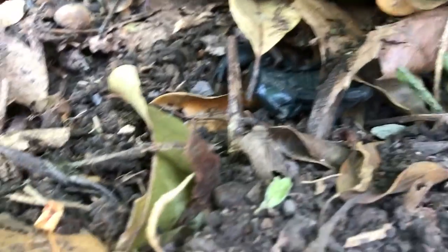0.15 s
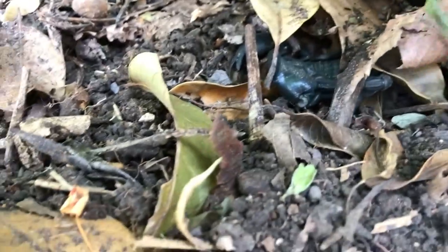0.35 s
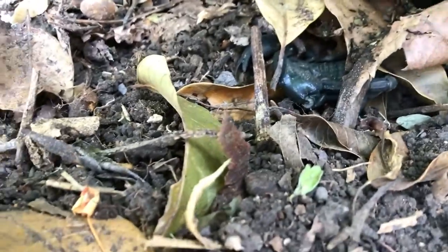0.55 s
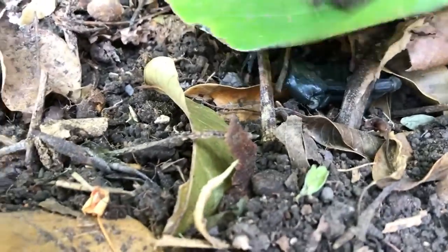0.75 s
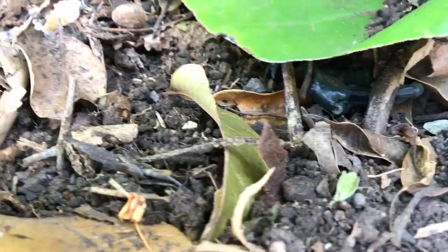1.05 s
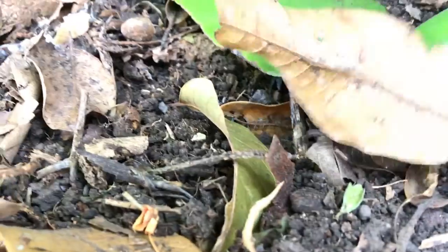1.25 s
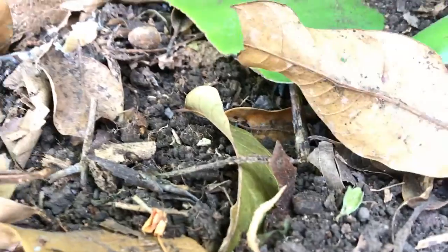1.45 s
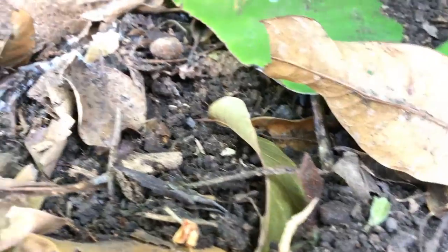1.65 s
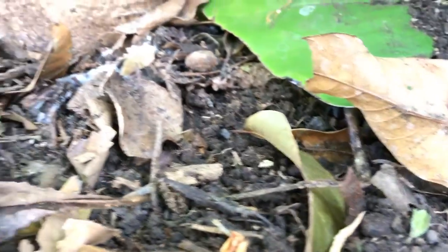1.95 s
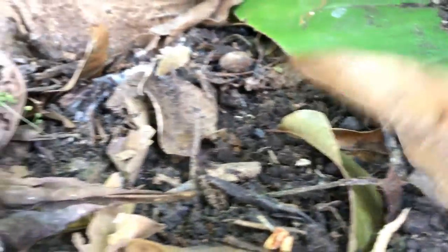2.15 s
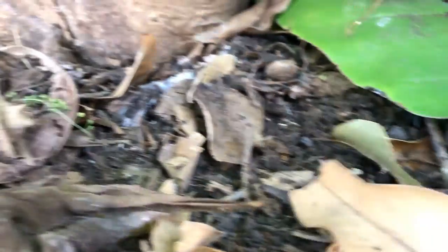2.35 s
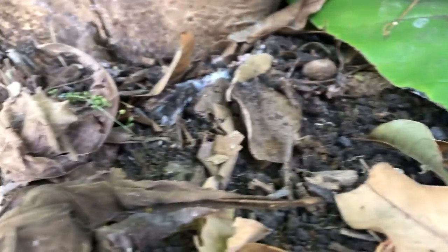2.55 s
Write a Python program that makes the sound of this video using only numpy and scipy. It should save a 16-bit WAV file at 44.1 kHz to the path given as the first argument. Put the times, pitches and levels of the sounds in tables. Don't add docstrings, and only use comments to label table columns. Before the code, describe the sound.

Dry leaves rustle and crackle in uneven bursts, scraped over soil litter close to the microphone

```python
import sys
import numpy as np
from scipy import signal
from scipy.fft import rfft, irfft
from scipy.io import wavfile
from scipy.ndimage import uniform_filter1d

SR = 44100
rng = np.random.default_rng(int(sys.argv[2]) if len(sys.argv) > 2 else 0)


def file_out(sig):
    cols = np.atleast_2d(sig).T
    lim = np.clip(cols, -1, 1)
    pcm = np.round(lim * 32767).astype(np.int16)
    wavfile.write(sys.argv[1], SR, pcm)


def gain_from_decibels(decibels):
    exponent = np.asarray(decibels, float) / 20
    return 10 ** exponent


N = 119070


def rms_one(x):
    return x / np.sqrt(np.mean(x ** 2) + 1e-20)


def coloured(x, points):
    hz, db = np.transpose(points)
    f = np.maximum(np.arange(len(x) // 2 + 1) * SR / len(x), 1)
    gain_db = np.interp(np.log(f), np.log(hz), db, left=-70)
    return irfft(rfft(x) * gain_from_decibels(gain_db), len(x))


def ring(clicks, hz, t60):
    r = gain_from_decibels(-60 / (t60 * SR))
    w = 2 * np.pi * min(hz, 0.45 * SR) / SR
    return signal.lfilter([0, np.sin(w)], [1, -2 * r * np.cos(w), r * r], clicks + 1e-18)


def fade(x, seconds):
    return signal.lfilter([1], [1, -np.exp(-1 / (max(seconds, 1e-4) * SR))], x)


def thin_below_pitch(x, hz):
    return signal.sosfilt(signal.butter(2, 0.6 * hz, "high", fs=SR, output="sos"), x)


def ground_dip(x, hz, width_hz, depth):
    return x - depth * signal.lfilter(*signal.iirpeak(hz, hz / width_hz, fs=SR), x)


# frequency in Hz, level in dB.
INLET_COLOUR = [(6800, -27), (7600, -5.5), (9400, 0), (10500, -8), (11200, -0.5), (12800, 1.5),
                (14200, -7.5), (15500, -2.5)]


def inlet(x):
    return coloured(x, INLET_COLOUR)


# frequency in Hz, level in dB.
LEAF_COLOUR = [(180, -7), (300, -6.5), (955, -8), (1300, -3), (1900, -5), (3000, -2.5), (5580, -2.5),
               (7500, -7), (9750, -37), (16500, -120)]


def leaf_body(x):
    return coloured(x, LEAF_COLOUR)


# frequency in Hz, level in dB.
RUMBLE_COLOUR = [(20, -37), (40, -8.5), (56, 1), (85, -8), (220, -11), (400, -28.5), (2000, -36.5),
                 (6000, -45.5)]


def rumble():
    return gain_from_decibels(-47) * rms_one(coloured(rng.standard_normal(N), RUMBLE_COLOUR))


# start in seconds, peak in dB, pitch
# in Hz, t60 in seconds.
VEIN_BREAKS = [(1.193, -13, 5550, .008), (1.1932, -20.5, 4100, 0.027), (1.1931, -21, 5230, .022),
               (1.1931, -22, 5980, .022), (1.1931, -23.5, 9270, 0.02), (1.1935, -29, 2900, .03),
               (1.3214, -15.5, 4450, 0.0067), (1.3216, -23, 1700, .011), (1.3216, -29, 11500, 0.011),
               (.9992, -17, 11600, .005), (2.3663, -17, 3030, .022), (2.3688, -18.5, 2990, 0.015),
               (2.368, -29.5, 760, 0.048), (.2262, -34.5, 1040, 0.017), (0.00395, -38, 474, .04),
               (.5, -30, 760, .04), (1.3635, -27, 4000, .003), (.168, -40, 3500, .003),
               (2.1775, -22, 1250, .025), (1.4215, -30.5, 1464, 0.023), (1.428, -33, 1285, .02),
               (.093, -39, 1600, .03), (2.051, -32.5, 5300, 0.017), (2.073, -30, 5460, 0.014),
               (2.074, -29, 6600, 0.013), (2.2465, -21, 5500, .01)]


def veins():
    out = np.zeros(N + SR)
    push = np.r_[1.0, np.zeros(SR // 10 - 1)]
    for start_s, db, hz, t60 in VEIN_BREAKS:
        i = int(start_s * SR)
        out[i:i + len(push)] += gain_from_decibels(db) * thin_below_pitch(ring(push, hz, t60), hz)
    return out[:N]


# start in seconds, peak in
# dB, ring in Hz, brightness in dB.
SNAPS_AND_KNOCKS = [(0.092, -28, 1760, -30), (0.2263, -21.5, 2000, -9.5), (0.499, -26.5, 755, -12),
                    (0.5366, -19.5, 9000, -6), (0.649, -17.5, 6500, -4), (0.654, -16, 9400, -3.5),
                    (0.667, -14.5, 2870, -13), (0.671, -11, 2780, -15), (0.708, -16, 2660, -9),
                    (0.736, -14, 2960, -14), (0.75, -29, 2040, 2), (0.851, -24, 1580, -20),
                    (0.9994, -18.5, 8200, 1.5), (1.0504, -29, 5600, 4.5), (1.086, -29, 1940, 7),
                    (1.108, -16, 6300, -7), (1.126, -21, 9300, -9), (1.193, -20.5, 1520, -7),
                    (1.3214, -18.5, 3140, -8), (1.363, -24, 880, -12), (1.42, -29, 3500, -16),
                    (2.161, -26.5, 8500, -2.5), (2.223, -13, 4380, -12), (2.238, -15.5, 2880, -9.5),
                    (2.246, -11.5, 5770, -17), (2.299, -12, 4760, -19), (2.367, -18, 6000, -12),
                    (2.508, -16, 6550, -18),
                    (0.00545, -37.5, 1620, -20), (.104, -33, 1800, -40), (1.089, -30, 670, -28),
               (1.198, -18, 3600, -15), (1.201, -22, 4200, -15), (1.177, -35, 6500, 2),
               (1.005, -28, 6000, 1), (2.073, -30, 5030, -6), (.5418, -17, 3200, -9.5),
               (1.103, -26, 1800, -15), (1.393, -20, 4500, -15.5), (2.181, -15, 1240, -22),
               (2.199, -10, 5900, -15), (2.275, -31, 4300, 0), (2.303, -21, 9500, -6),
               (2.342, -22, 1460, -9), (2.35, -27, 3000, -4), (2.467, -24, 2760, -10),
               (2.494, -22.5, 3000, -24), (.768, -20, 7800, -4), (.966, -35, 1500, -7),
               (2.12, -34, 6000, -3), (2.531, -41, 6000, -4), (1.708, -44, 5000, -6),
               (2.052, -32, 5300, -9)]
# start in seconds, peak in dB,
# ring in Hz, brightness in dB.
MORE_SNAPS = [(.017, -33, 8880, -9), (.274, -29, 3500, -10), (.302, -23.5, 2500, -12),
              (0.305, -27, 9500, -4), (.382, -26, 5250, -7), (.528, -30, 3700, -16),
              (0.6578, -15, 1680, -20), (.673, -23, 9500, -1), (.944, -22, 9400, -7),
              (0.964, -16, 9200, -8), (0.9673, -16, 5500, -9), (.986, -32, 3000, -20),
              (1.079, -23, 9300, -5), (1.1305, -23, 5060, -14), (1.83, -46, 12300, -5),
              (1.837, -43, 7000, -14), (1.901, -47, 4380, -4), (1.941, -38, 4270, -9),
              (1.96, -41, 8880, -8), (1.98, -45, 11800, -6), (1.989, -41, 5490, -6),
              (2.032, -29, 8050, -7), (2.075, -21, 9200, -3), (2.084, -27, 6500, -10),
              (2.153, -30, 7000, -5), (2.233, -24, 9000, -4), (2.318, -17, 9000, -12),
              (2.551, -44, 11800, -4), (2.607, -43, 9700, -12), (2.34, -18, 5000, -13)]


def snaps():
    rise_s, decay_s = 0.00019, 0.0012
    ring_db, puff_db, tick_db = -10, -19, 5.5
    rows = SNAPS_AND_KNOCKS + MORE_SNAPS
    size = SR // 20
    t = np.arange(size) / SR
    click = np.arange(size) == 0
    shape = (1 - np.exp(-t / rise_s)) * np.exp(-t / decay_s)
    out = np.zeros(N + SR)
    for start_s, db, hz, bright_db in rows:
        low, high, tear = rng.standard_normal((3, size))
        t60 = min(0.022, 18 / hz)
        push = click + 0.26 * tear * shape
        neighbours = sum(ring(push, hz * q, t60 * 0.26) for q in rng.uniform(0.65, 1.6, 2))
        tone = thin_below_pitch(ring(push, hz, t60) + 0.5 * neighbours, hz)
        puff = rms_one(leaf_body(low)) * shape
        tick = rms_one(inlet(high)) * shape
        snap = gain_from_decibels(ring_db) * tone + gain_from_decibels(puff_db) * puff + gain_from_decibels(bright_db + tick_db) * tick
        i = int(start_s * SR)
        out[i:i + size] += gain_from_decibels(db) * snap
    return out[:N]


def clumps():
    per_s, decay_s, spread_db, depth_db = 400, 0.0012, 2.5, -6
    size = gain_from_decibels(spread_db * np.minimum(rng.exponential(1, N), 2))
    start = (rng.random(N) < per_s / SR) * size
    return rms_one(1 + gain_from_decibels(depth_db) * uniform_filter1d(fade(start, decay_s), size=50))


def cracks(grip):
    per_s, spread_db, cycles = 2600, 3.0, 26.0
    size = gain_from_decibels(spread_db * np.minimum(rng.exponential(1, N), 3)) * rng.choice([-1, 1], N)
    ticks = size * (rng.random(N) < per_s / SR) * grip
    pitches = np.geomspace(400, 7000, 24)
    dealt = rng.integers(0, 24, N)
    rings = np.zeros(N)
    for k, hz in enumerate(pitches):
        rings += hz / 7000 * ring(ticks * (dealt == k), hz, cycles / hz)
    bare = fade(np.abs(ticks), 0.00021) * rng.standard_normal(N)
    return rms_one(rings), rms_one(bare)


def patchy(x, low_hz, high_hz, depth_db, count):
    rate_hz, hop = 38, 20
    edges = np.geomspace(low_hz, high_hz, count + 1)
    spectrum = rfft(x)
    f = np.arange(N // 2 + 1) * SR / N
    r = np.exp(-2 * np.pi * rate_hz * hop / SR)
    out = np.zeros(N)
    for low, high in zip(edges, edges[1:]):
        drift = signal.lfilter([1], [1, -2 * r, r * r], rng.standard_normal(N // hop + 502))
        slow = rms_one(drift[500:])
        swell = np.interp(np.arange(N) / hop, np.arange(len(slow)), slow)
        offset = np.log(f / np.sqrt(low * high) + 1e-9) / np.log(high / low)
        window = np.cos(np.pi / 2 * np.clip(offset, -1, 1)) ** 2
        out += irfft(spectrum * window, N) * gain_from_decibels(depth_db * swell)
    return rms_one(out)


# time in seconds, level in dB.
LITTER_STIR = [(0, -42), (.17, -44), (.2, -52.5), (.3, -57), (1.45, -46.5), (1.65, -48.5), (1.85, -55.5),
               (1.95, -47), (2.5, -46.5), (2.57, -55), (2.7, -75)]
# start in seconds,
# length in seconds, level in dB, body over sizzle in dB.
LEAF_SLIDES = [(0.235, 0.055, -42, 3.5), (0.297, 0.041, -35.5, 2), (0.339, 0.042, -41.5, -0.5),
               (.379, 0.017, -37, 1), (0.401, 0.055, -48.5, 3.5), (0.454, 0.042, -43, 5),
               (0.498, 0.0088, -28.5, -1.5), (0.511, 0.16, -41, 1), (0.624, 0.023, -35.5, 0),
               (.648, 0.01, -29.5, 5), (.665, 0.011, -26.5, 5), (0.67, 0.054, -35, 2),
               (0.721, 0.035, -29, -1), (0.756, 0.156, -39, 1), (0.901, 0.061, -35, -3),
               (.958, 0.012, -24.5, -2.5), (0.974, 0.023, -39.5, -9), (.999, 0.031, -34.5, -7),
               (1.027, .02, -47, 3), (1.052, 0.078, -36, -6), (1.125, .016, -48, -2),
               (1.177, 0.015, -58, -12), (1.194, 0.008, -33.5, 8), (1.208, 0.054, -40, 1),
                      (1.285, 0.03, -39, 4), (1.321, 0.01, -38, 12), (1.325, 0.056, -46.5, 0.5),
                      (1.386, 0.011, -41, 4), (1.393, 0.02, -49, 4), (1.414, 0.021, -41.5, 4),
                      (1.528, 0.11, -39, -5), (1.62, 0.021, -59, -8), (1.762, 0.003, -49, 23),
                      (1.771, 0.022, -47, -1), (2.028, 0.042, -44, -5.5), (2.047, .01, -40.5, -7),
                      (2.069, 0.011, -37, -9.5), (2.08, .011, -42.5, 0), (2.102, 0.13, -47, 2),
                      (2.15, 0.023, -40.5, -3.5), (2.176, 0.026, -26, 5.5), (2.203, 0.014, -38, 5),
                      (2.219, 0.035, -35, 9), (2.251, 0.03, -52.5, 26), (2.274, 0.018, -37.5, 0),
                      (2.292, 0.08, -30.5, -1), (2.336, 0.028, -27, 1), (2.374, 0.03, -34.5, -2),
                      (2.406, 0.069, -42, 2.5), (2.474, 0.03, -53, 4), (2.506, 0.0076, -47.5, 11),
                      (2.627, 0.0058, -49, -2.5)]


def pressure():
    t = np.arange(N) / SR
    stir = gain_from_decibels(np.interp(t, *np.transpose(LITTER_STIR)) - 12.5) ** 2
    body, sizzle = stir * gain_from_decibels(-2), stir.copy()
    for start_s, length_s, db, body_db in LEAF_SLIDES:
        attack_s = 0.001 + 0.03 * length_s
        release_s = 0.002 + 0.06 * length_s
        swell = np.clip((t - start_s) / attack_s, 0, 1)
        ebb = np.exp(-np.clip(t - start_s - 0.94 * length_s, 0, 1) / release_s)
        power = (swell * ebb) ** 2 * gain_from_decibels(2 * db)
        body_share = 1 / (1 + gain_from_decibels(-2 * body_db))
        body += power * body_share
        sizzle += power * (1 - body_share)
    return np.sqrt(body), np.sqrt(sizzle)


def rustle():
    grip = clumps()
    rings, ticks = cracks(grip)
    dark_rub, bright_rub = grip * rng.standard_normal((2, N))
    body = leaf_body(rings + gain_from_decibels(1) * dark_rub)
    body = ground_dip(body, hz=4650, width_hz=160, depth=0.35)
    body = patchy(body, 186, 9900, depth_db=2.6, count=14)
    sizzle = inlet(ticks + gain_from_decibels(6) * bright_rub)
    sizzle = patchy(sizzle, 6900, 18500, depth_db=2.2, count=6)
    body_gain, sizzle_gain = pressure()
    return body_gain * body + sizzle_gain * sizzle


def scene():
    return (rumble() + veins() + snaps() + rustle())[None]


def top_cut(x):
    return signal.sosfilt(signal.butter(12, 16990, fs=SR, output="sos"), x)


def record(dry):
    top_hz = 15760
    f = np.arange(N // 2 + 1) * SR / N
    low = irfft(rfft(dry) * (f < top_hz), N)
    band = (f > top_hz) * (f < 16600) * gain_from_decibels((top_hz - f) / 70)
    top = irfft(rfft(rng.standard_normal(N)) * band, N)
    fast = uniform_filter1d(low ** 2, size=90)
    slow = uniform_filter1d(low ** 2, size=2000)
    sharp = uniform_filter1d(1.0 * (fast > 10 * slow), size=200) > 0.05
    trace = gain_from_decibels(-14) * top * np.sqrt(fast) * sharp
    return top_cut(low + trace)


dry = scene()
out = record(dry)
file_out(out)
```